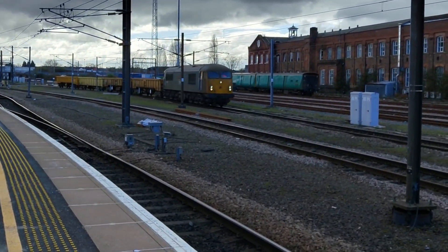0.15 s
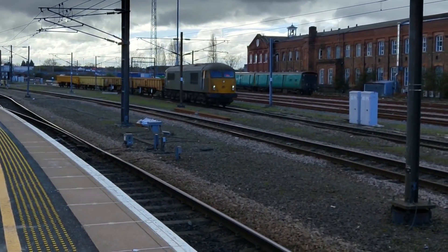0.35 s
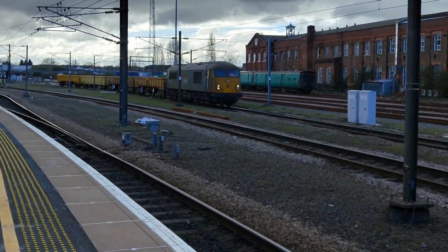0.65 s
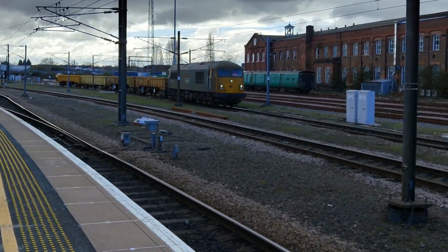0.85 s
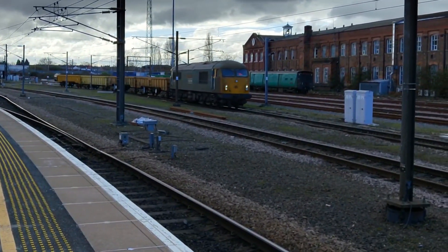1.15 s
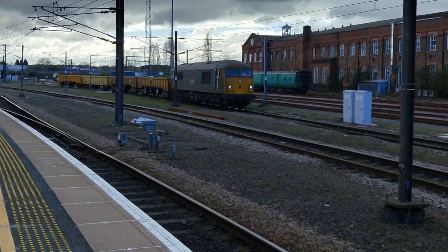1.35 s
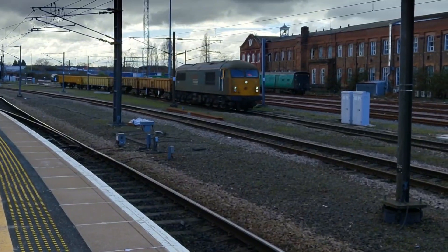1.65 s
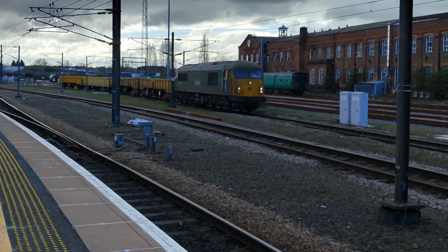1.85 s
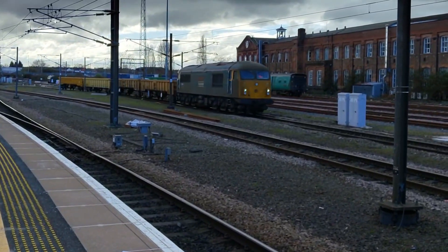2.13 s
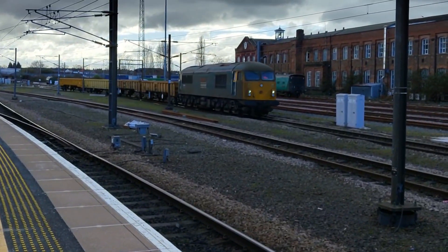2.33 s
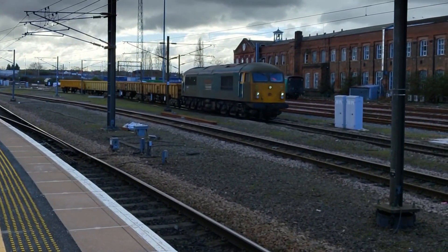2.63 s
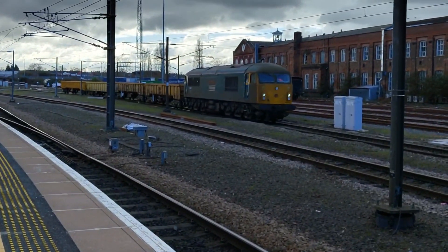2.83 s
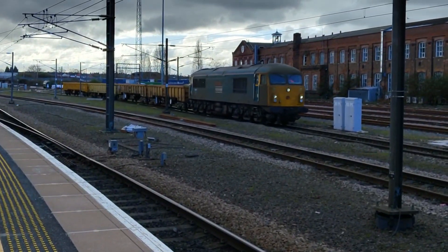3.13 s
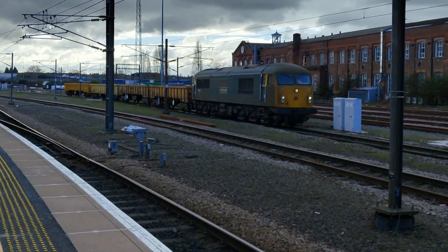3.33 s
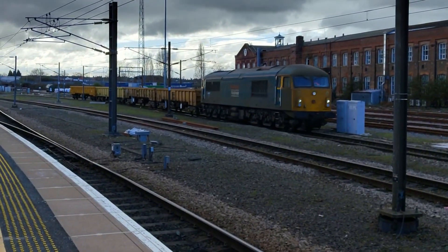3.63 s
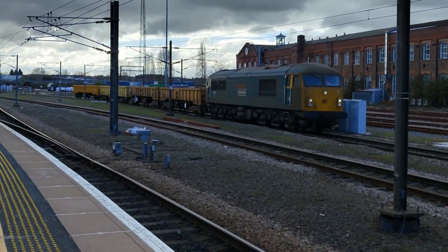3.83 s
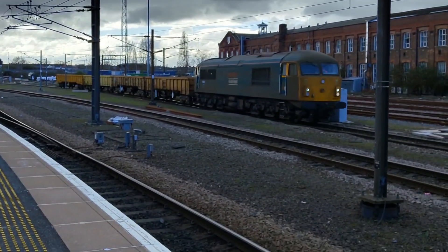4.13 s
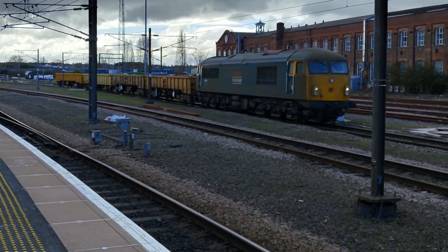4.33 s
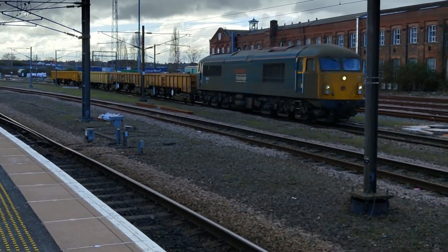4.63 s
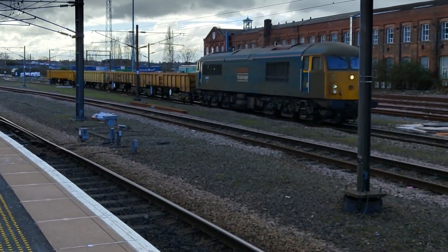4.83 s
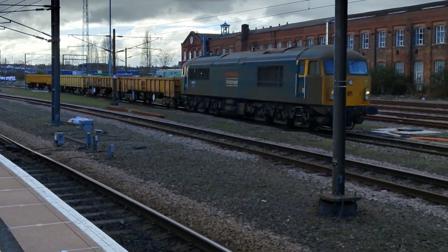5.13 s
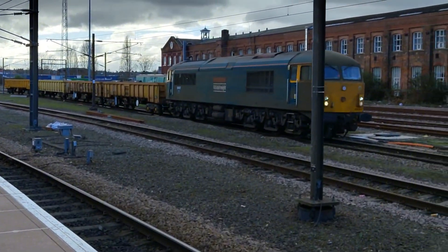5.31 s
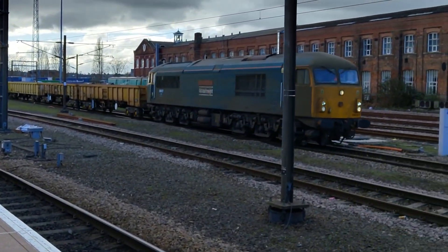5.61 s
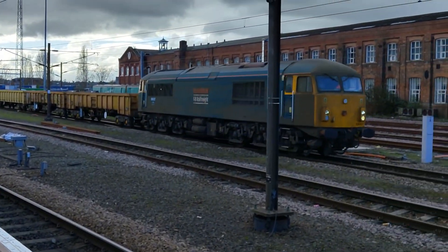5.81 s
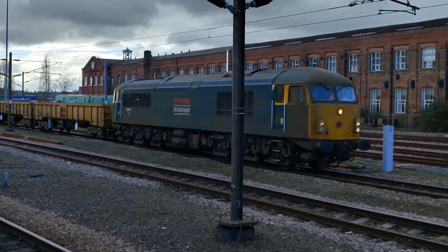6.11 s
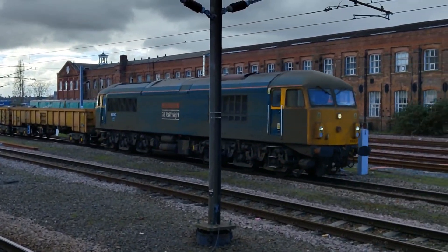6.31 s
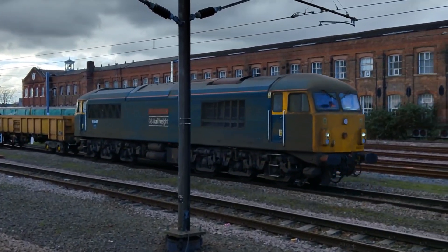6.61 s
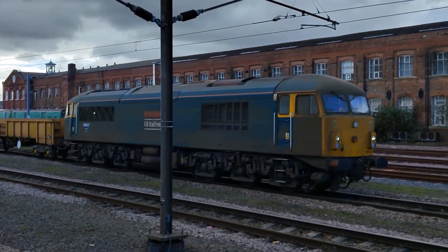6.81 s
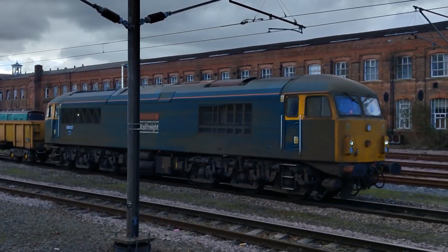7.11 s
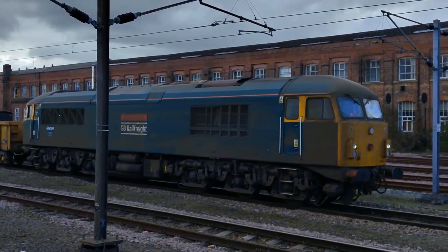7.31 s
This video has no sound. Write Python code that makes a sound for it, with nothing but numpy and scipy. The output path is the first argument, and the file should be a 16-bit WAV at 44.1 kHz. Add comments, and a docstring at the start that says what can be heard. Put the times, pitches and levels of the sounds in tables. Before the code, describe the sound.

A freight train approaches an open platform on a gusty day. Low wind rumble and moaning cover much of the distant engine and rolling noise, with sharp pops as gusts hit the handheld stereo microphone. The train steadily grows and brightens; metal rattles, short high squeals and soft knocks over rail joints join thin wavering whines. Late on, a longer squeal gives way to violent wind blows and a louder roar.

```python
"""Gusts moan, flutter and tear on a two-port microphone at a platform on a gusty day.
A diesel locomotive with wagons rolls in, its engine and wheels a noise that grows and changes colour.
Wavering tones make the turbocharger whine and gears; flanges squeal in short tones with partials,
taps ring loose steel, and shaped bursts of bright noise tick close by."""
import sys
import numpy as np
from scipy import signal
from scipy.fft import rfft, irfft, next_fast_len
from scipy.io import wavfile
from scipy.ndimage import uniform_filter1d

SR = 44100
rng = np.random.default_rng(int(sys.argv[2]) if len(sys.argv) > 2 else 0)


def undo_db(level):
    """Turn decibels back into plain size, where 20 dB means ten times bigger."""
    steps = np.asarray(level, float) / 20
    return 10 ** steps


def waveform_to_disk(signal):
    """Save audio, clipped to [-1, 1], as 16-bit WAV at the path in sys.argv[1]."""
    frames = np.transpose(np.atleast_2d(signal))
    scaled = np.clip(frames, -1, 1) * 32767
    samples = np.round(scaled).astype(np.int16)
    wavfile.write(sys.argv[1], SR, samples)


N = 328986  # samples


def ports(left, right):
    """One value for each microphone port, as a column."""
    return np.array([[left], [right]])


def evened(x):
    """Scales to rms 1."""
    return x / np.sqrt(np.mean(x ** 2) + 1e-20)


def read(points, hz):
    """Reads a spectrum table on a log-frequency axis."""
    f, value = np.transpose(points)
    return np.interp(np.log(hz + 1), np.log(f + 1), value)


def curve(table, column=1):
    """One column of a time table, sample by sample."""
    rows = np.array(table)
    return np.interp(np.arange(N) / SR, rows[:, 0], rows[:, column])


def in_band(x, lo, hi):
    """Scales x so that the mean of its ports has rms 1 between lo and hi Hz."""
    middle = x.reshape(-1, N).mean(0)
    z, hz = rfft(middle), np.fft.rfftfreq(N, 1 / SR)
    inside = (hz > lo) & (hz < hi)
    return x / (np.sqrt(2 * np.sum(abs(z[inside]) ** 2)) / N)


def drift(size):
    """Slow smooth chance, rms 1; size is the smoothing length in samples."""
    once = uniform_filter1d(rng.standard_normal(N), size=size)
    return evened(uniform_filter1d(once, size=size))


def wavering(hz, waver, size, count=N):
    """A tone of rms 1 whose pitch drifts at random by the fraction waver (rms)."""
    wander = evened(uniform_filter1d(rng.standard_normal(count), size=size))
    cycles = np.cumsum(hz * (1 + waver * wander)) / SR
    return np.sqrt(2) * np.sin(2 * np.pi * (cycles + rng.random()))


def narrow(hz, width, like, count=N):
    """Noise in a narrow band on both ports, rms 1; smoothed twice so that its skirts stay dark."""
    a, b = rng.standard_normal((count, 2, 2)).T[0] + 1j * rng.standard_normal((count, 2)).T
    like = np.clip(like, -1, 1)
    r = np.exp(-np.pi * width / SR)
    pair = [a, like * a + np.sqrt(1 - like ** 2) * b]
    slow = signal.lfilter([1], [1, -2 * r, r * r], pair)
    carrier = np.exp(2j * np.pi * np.cumsum(hz * np.ones(count)) / SR)
    return evened((slow * carrier).real)


def hiss(colour, same, patchy_db, size=1024):
    """Two-port noise from random short-time spectra with drifting patches."""
    frames, hz = N // (size // 4) + 5, np.fft.rfftfreq(size, 1 / SR)
    a, b, c, d, patches = rng.standard_normal((frames, len(hz), 5)).T
    patches = uniform_filter1d(patches, size=10, axis=0)
    patches = evened(uniform_filter1d(patches, size=12, axis=1))
    same = np.clip(same(hz), -1, 1)[:, None]
    left = a + 1j * b
    right = same * left + np.sqrt(1 - same ** 2) * (c + 1j * d)
    z = np.array([left, right]) * undo_db(read(colour, hz)[:, None] + patchy_db * patches)
    return signal.istft(z, nperseg=size, noverlap=size - size // 4)[1][:, :N]


def bursts(rows):
    """Envelope of events, each row (start s, peak dB, rise s, time to fall 60 dB in s)."""
    t, out = np.arange(N) / SR, np.zeros(N)
    for s, db, rise, t60 in rows:
        span = slice(round(s * SR), round((s + 1) * SR))
        u = t[span] - s
        fall_db = 60 * np.maximum(u - rise, 0) / max(t60, .005)
        out[span] += undo_db(db - fall_db) * np.clip(u / rise, 0, 1)
    return out


def spreading_db():
    """Loss with the locomotive's distance, 0 dB abeam of the microphone, a point still ahead at the end."""
    speed_m_per_s, abeam_s, aside_m = 7.34, 8.21, 15.96
    along = speed_m_per_s * (abeam_s - np.arange(N) / SR)
    return -10 * np.log10(1 + (along / aside_m) ** 2)


# Single sucks and rebounds of the diaphragm in the hardest gusts.
# Each row: start in seconds, peak in dB.
DIAPHRAGM_PUSHES = [(.354, -9), (.446, -8), (.469, -12), (.931, -17), (2.145, -12), (6.766, -11),
                    (7.052, -7.5), (7.076, -7), (7.156, -10)]


def pushes():
    """Each push is one lopsided pressure pulse: a suck, then a longer, weaker rebound."""
    push_s = .003  # time scale of the pulse
    kicks, u = np.zeros(N), np.arange(2000) / SR / push_s
    for s, db in DIAPHRAGM_PUSHES:
        kicks[round(s * SR)] = undo_db(db)
    return signal.oaconvolve(kicks, -u ** 2 * (3 - u) * np.exp(.25 - u))[:N]


# Colours of the wind at the ports: deep rumble, faster flutter, and tearing.
# Each row: frequency in Hz, relative level in dB per Hz.
RUMBLE_COLOUR = [(12, -19), (22, -1.5), (35, 3), (55, -5.5), (80, -8), (105, -4), (130, -25), (200, -46.5),
                 (500, -130)]
FLUTTER_COLOUR = [(70, -26), (110, 5.5), (200, 2), (300, -8), (400, -24), (600, -58.5), (1200, -130)]
TEAR_COLOUR = [(120, -31), (200, -12), (270, -1), (350, 3), (400, -5), (678, -12), (1110, -25.5),
               (1500, -22), (1950, -49), (3300, -120)]
# The gusts as they reach the microphone. Each row: time in seconds, strength in dB,
# share of the lower moan from 0 to 1, flutter in dB relative to the strength.
GUSTS = [(0, -26, 0.46, -14.5), (.11, -24.5, .6, -10.5), (.15, -18.5, 1, -14.5), (.42, -18.5, 0.98, -20),
         (.48, -19, 0.9, -20), (.53, -26, 1, -30), (.548, -40.5, 1, -7), (.75, -36, 0.1, -5),
         (.78, -28.5, 0.97, -7), (.92, -21, 0.38, -14), (1.2, -21, 0.9, -18), (1.42, -22, 0.04, -13),
         (1.74, -16.5, 1, -18), (1.85, -27.5, 0.1, -11), (1.9, -26.5, 0.4, -5.5), (1.99, -24.5, 0.76, -11),
         (2.04, -15.5, 0.95, -11.5), (2.16, -20, 0.22, -16), (2.45, -23.5, 0.84, -15),
         (2.93, -16, 0.76, -20.5), (3.1, -24.5, 0.26, -12.5), (3.74, -22, 1, -15.5),
         (3.95, -23.5, 0.44, -12), (4.7, -21, 0, -14), (5.17, -22.5, 1, -12), (5.25, -15.5, 0.83, -19.5),
         (5.7, -23.5, 0.43, -9.5), (6.1, -17, 0.4, -14.5), (6.5, -21.5, 0.26, -9), (6.84, -18, 0.86, -3.5),
         (6.91, -19, 0.86, -5.5), (6.94, -21, 1, -4.5), (7.02, -23.5, 1, 0), (7.04, -17, 0.4, -2),
         (7.12, -16, 1, -8), (7.2, -15.5, 1, -7.5), (7.345, -12.5, 1, -12), (7.365, -29, 0.9, -16),
         (7.42, -35, 0.8, -21), (7.46, -17, 0.4, -21)]
# Sudden blows of air. Each row: start in seconds, peak in dB.
BLOWS = [(0.255, -28.5), (0.355, -25), (0.441, -22), (0.467, -18.5), (0.928, -27), (1.111, -24.5),
         (1.474, -25), (1.631, -27), (1.725, -34), (2.953, -30), (4.527, -26.5), (5.148, -38), (5.375, -41),
         (6.669, -17), (6.754, -14.5), (6.766, -23.5), (6.827, -23), (6.88, -17.5), (7.034, -19),
         (7.047, -4.5), (7.072, -13.5), (7.12, -15), (7.147, -13.5), (7.165, -16), (7.191, -21.5),
         (7.291, -16), (7.325, -24.5)]


def wind():
    """Lumpy pressure on the ports: rumble, moans, a faster flutter, tearing and blows in hard gusts."""
    rumble_db, moan_db = -3.5, -1.5  # relative to the gust strength
    moan_hz, moan_waver = (42.2, 66.73), 0.0602
    throb_db, eddy_lumps_db, tear_lumps_db = 1.5, 0.88, 2.5  # rms swings
    blow_rise_s, blow_dying_s, thump_db = 0.0057, 0.095, -6.5  # each blow also pushes the rumble
    tear_db, tear_from_db, tear_growth = -33, -21.5, 1.3  # tearing grows faster than its flutter
    tear_lean_db = -11  # left minus right
    turn_db_per_s, turned_s = 2, 8.1  # the microphone turns into the wind, so tearing gains with time
    rumble = in_band(hiss(RUMBLE_COLOUR, lambda hz: 1 + 0 * hz, 0.62, size=4096), 34.7, 100)
    flutter = in_band(hiss(FLUTTER_COLOUR, lambda hz: 1 + 0 * hz, 1.3, size=2048), 74, 420)
    lumps = drift(size=700)
    tear = hiss(TEAR_COLOUR, lambda hz: .3 + 0 * hz, 2.5) * undo_db(tear_lumps_db * lumps)
    tear = in_band(tear, 330, 600)

    strength_db = curve(GUSTS)
    lower = np.clip(curve(GUSTS, column=2), 0, 1)
    blows = bursts([(s, db, blow_rise_s, blow_dying_s) for s, db in BLOWS])
    eddies = undo_db(strength_db + curve(GUSTS, column=3) + eddy_lumps_db * lumps) + blows
    turn_db = turn_db_per_s * (np.arange(N) / SR - turned_s)
    torn = undo_db(tear_db + turn_db + ports(.5, -.5) * tear_lean_db)
    torn = torn * (eddies / undo_db(tear_from_db)) ** tear_growth

    moans = lower * wavering(moan_hz[0], moan_waver, size=4000)
    moans = moans + (1 - lower) * wavering(moan_hz[1], moan_waver, size=4000)
    throbs = undo_db(strength_db + throb_db * drift(size=1500))
    low = throbs * (undo_db(rumble_db) * rumble + undo_db(moan_db) * moans)
    pressure = low + undo_db(thump_db) * blows * rumble + pushes() + eddies * flutter + torn * tear
    return .9 * np.tanh(pressure / .9)  # the strongest blows saturate the diaphragm


# Colour of the ticks. Each row: frequency in Hz, relative level in dB per Hz.
TICK_SPECTRUM = [(2000, -15.5), (3200, -6), (5000, -5), (6500, 2), (7700, -7), (8500, -20.5), (9500, -8),
                 (12000, -13), (15000, -15.5), (15800, -42)]
# Small sharp ticks close to the microphone.
# Each row: start in seconds, level in dB, left minus right in dB.
CLOSE_TICKS = [(0.4805, -74, 12), (1.32, -66.5, 6), (3.078, -51.5, -9), (3.357, -52.5, -12),
               (4.28, -51.5, -9), (4.554, -51, -4), (4.827, -53, -10)]


def ticks():
    """Each tick is a bright crackle of about a hundredth of a second, with weaker ones around it."""
    rebound_s, rebound_db = .053, -11.5  # a weaker one after
    lead_s, lead_db = 0.029, -13  # and a weaker one before
    noise = in_band(hiss(TICK_SPECTRUM, lambda hz: 0.19 + 0 * hz, 2.1, size=256), 9000, 20000)
    t, shape = np.arange(N) / SR, np.zeros((2, N))
    for s, db, pan_db in CLOSE_TICKS:
        for later, less_db in (0, 0), (rebound_s, rebound_db), (-lead_s, lead_db):
            u = np.clip(t - s - later, 0, 1)
            dying = np.exp(-(u / .0085) ** 2) + .12 * np.exp(-u / .035)  # a faint tail lasts longer
            body = np.clip(u / .002, 0, 1) * dying
            shape += undo_db(db + less_db + ports(.5, -.5) * pan_db) * body
    return noise * shape


# Loose steel on the train. Each row: ringing frequency in Hz, relative level in dB,
# time to fall 60 dB in seconds.
LOOSE_STEEL = [(3560, 4.5, 0.0033), (5760, -26, 0.013), (6230, -8.5, 0.0098), (6700, -1.5, 0.0054),
               (7240, 0, 0.0038), (7230, -8.5, 0.0072), (9990, -20.5, 0.015), (12100, -30.5, 0.006)]
# Bursts of rattling. Each row: start in seconds, peak in dB, time to fall 60 dB in seconds.
RATTLE_BURSTS = [(0.213, -72, 0.2), (0.575, -62.5, 0.13), (1.048, -71, 0.043), (1.3653, -65, 0.29),
                 (1.7779, -59, 0.22), (2.1286, -62, 0.29), (2.314, -57.5, 0.19), (2.374, -57, 0.14),
                 (2.5187, -56.5, 0.13), (2.7294, -55, 0.17), (2.9856, -62, 0.16), (3.029, -55.5, 0.18),
                 (3.252, -60, .05), (3.7239, -62, 0.055), (3.9384, -61, 0.066), (4.4603, -59, 0.068),
                 (4.4917, -55.5, 0.48), (4.8813, -59, 0.23), (4.9741, -59, 0.13), (5.2101, -64.5, 1),
                 (5.6032, -58.5, 0.2), (5.6635, -59.5, 0.34), (6.0367, -67, 0.045), (6.8364, -49.5, 0.36),
                 (7.0868, -56, 0.13), (7.2694, -64, 0.1)]


def rattle():
    """Dense uneven taps ring the resonances of loose steel, swelling in bursts."""
    shaking_db, shaking_slope, fits_db = -57, 2.22, 3.94  # abeam level, dB per dB of spreading, rms swing
    taps_per_s = 500  # on each port, for each resonance
    t = np.arange(1500) / SR
    fits = evened(uniform_filter1d(rng.standard_normal(N), size=2500))  # the shaking comes in fits
    force = undo_db(shaking_db + shaking_slope * spreading_db() + fits_db * fits)
    force = force + bursts([(s, db, 0.0009, t60) for s, db, t60 in RATTLE_BURSTS])
    out = np.zeros((2, N))
    for hz, db, t60 in LOOSE_STEEL:
        strength = undo_db(2.0 * np.minimum(rng.exponential(1, (N, 2)).T, 5))
        taps = strength * (rng.random((N, 2)).T < taps_per_s / SR)
        taps = taps * rng.choice([-1, 1], (N, 2)).T
        onset = np.minimum(t / 0.00018, 1)
        ring = undo_db(db - 60 * t / t60) * onset * np.sin(2 * np.pi * hz * t)
        out += signal.oaconvolve(taps, ring[None], axes=1)[:, :N]
    crossed = out + 0.23 * out[::-1]  # each port also hears some of the other side
    return in_band(crossed, 3860, 6200) * force


# Flange squeals. Each row: start in seconds, end in seconds, pitch in Hz, level in dB,
# 2nd partial in dB relative to that level, 5th partial likewise.
FLANGE_SQUEALS = [(1.089, 1.332, 1407, -53.5, 1, -1), (3.475, 3.62, 1395, -52, -26, -29),
                  (4.463, 4.573, 1264, -70, -12, 18), (5.514, 5.646, 1380, -53, -20, -15),
                  (6.0, 6.12, 1208, -46, -20, -24), (6.335, 6.683, 1377, -41, -14, -26)]


def squeals():
    """Stick-slip of a flange rings the wheel on a tone and two of its partials."""
    flutter_db = 0.9
    out = np.zeros((2, N))
    for start, end, hz, db, second_db, fifth_db in FLANGE_SQUEALS:
        span = slice(round(start * SR), round(end * SR))
        count = span.stop - span.start
        tone = wavering(hz, 0.0042, size=900, count=count) * ports(1.2, .4)
        second = wavering(2 * hz, 0.0013, size=900, count=count) * ports(1.2, .3)
        fifth = narrow(5 * hz, 60, 0.34, count=count)
        tone = tone + undo_db(second_db) * second + undo_db(fifth_db) * fifth
        level = undo_db(db + flutter_db * drift(size=500)[:count])
        out[:, span] += level * signal.windows.tukey(count, .65) * tone
    return out


# Gear tones. Each row: time in seconds, lower tone in dB, upper tone in dB.
GEAR_LEVELS = [(0, -61, -70.5), (1.3, -73.5, -69), (1.5, -66, -63), (2.7, -72, -66), (2.85, -57.5, -61),
               (3.3, -67, -66), (4.1, -64, -63), (4.3, -57.5, -74), (5.3, -56, -69.5), (5.5, -68, -61),
               (5.95, -65, -69), (6.1, -51, -65), (6.5, -51.5, -66), (6.9, -51, -66), (7.46, -56, -62)]


def gears():
    """Two thin gear tones, nearly steady in pitch, flutter a little in level."""
    out = np.zeros((2, N))
    for column, hz in (1, 1330), (2, 1446):
        level = undo_db(curve(GEAR_LEVELS, column=column) + 1.7 * drift(size=2500))
        out += level * wavering(hz, 0.003, size=700) * ports(1.1, .6)
    return out


# Turbocharger whine. Each row: time in seconds, level in dB.
WHINE_LEVEL = [(0, -66.5), (.4, -68.5), (.9, -76.5), (1.2, -69), (1.7, -70.5), (2.0, -65), (2.3, -62.5),
               (2.6, -60), (2.75, -58), (2.9, -63), (3.1, -66), (3.75, -75.5), (4.5, -65.5), (5.0, -70.5),
               (5.4, -62.5), (5.55, -56), (5.85, -52.5), (5.95, -63), (6.35, -62.5), (6.8, -56),
               (7.17, -54), (7.46, -58)]


def whine():
    """The turbocharger: a thin tone that wavers and swells on its way through moving air."""
    whine_hz, swell_db = 4443, 1
    sag_from_s, sag_hz_per_s = 5.8, 19  # the pitch sinks as the locomotive draws level
    hz = whine_hz - sag_hz_per_s * np.maximum(np.arange(N) / SR - sag_from_s, 0)
    tone = wavering(hz, 0.0015, size=800) * ports(.8, .2)
    tone = tone + 1.18 * narrow(whine_hz - (whine_hz - hz), 24, 0.48)
    return undo_db(curve(WHINE_LEVEL) + swell_db * drift(size=2500)) * tone


# How alike the train sounds at the two ports. Each row: frequency in Hz, likeness from 0 to 1.
PORT_LIKENESS = [(60, 0.91), (100, 0.36), (170, 0.93), (300, 0.85), (500, 0.87), (850, 0.35), (1450, 0.058),
                 (2470, 0.53), (4210, 0.07), (7160, 0.04)]


def hum(hz, width, far_db, near_db, near):
    """One resonance fed by rolling noise; it swells and wanders in pitch on its own."""
    swell_db, pitch_drift = 2, 0.001985  # rms swing, rms fraction of the pitch
    band = narrow(hz * (1 + pitch_drift * drift(size=9000)), width, read(PORT_LIKENESS, hz))
    return undo_db(far_db + (near_db - far_db) * near + swell_db * drift(size=4000)) * band


# Colours of the train far off and close to the microphone.
# Each row: frequency in Hz, relative level in dB per Hz.
FAR_COLOUR = [(35, -36), (60, 6), (108, -0.5), (329, -15.5), (364, -4.5), (395, -3.5), (446, -8.5),
              (569, -12), (697, -5), (1180, -20), (1840, -19), (2760, -29.5), (3060, -19), (4140, -31),
              (7610, -70), (9890, -71.5), (16700, -120)]
NEAR_COLOUR = [(120, -32), (200, -3.5), (288, 1.5), (409, -31), (441, -13.5), (538, -18.5), (697, -12),
               (1100, -25), (1360, -15.5), (1640, -17), (2220, -14), (2450, -18.5), (2750, -26),
               (3100, -21), (4530, -28.5), (5360, -32.5), (7610, -37.5), (9890, -59), (14000, -64),
               (16700, -120)]
# The approach. Each row: time in seconds, share of the near colour from 0 to 1.
APPROACH = [(0, 0.18), (3, 0.58), (5.3, 0.48), (5.9, 0.92), (7.46, 0.94)]
# Body, gears and rails hum in narrow bands. Each row: centre in Hz, width in Hz of each of two
# smoothings, level in dB relative to the roar when far, the same when near.
NARROW_HUMS = [(353.5, 38, -1.5, -10.5), (439, 17.6, -5.5, -8.5), (700.3, 45, -2, -8.5),
               (728.6, 33, -2, -7.5), (1014, 47, -9.5, -17), (1870, 34, -15, -10.5),
               (2432, 38, -12.5, -9.5), (2680, 14, -20, -27), (3215, 70, -19, -24), (3545, 70, -27, -17), ]
# Wheels over joints and points. Each row: start in seconds, envelope peak in dB,
# rise in seconds, time to fall 60 dB in seconds.
RAIL_JOINTS = [(1.23, -45, 0.045, .3), (5.6, -47, 0.091, 0.5), (5.93, -38.5, 0.11, 0.91),
               (6.829, -37, 0.057, 0.15), (7.2014, -40, 0.018, 0.23)]


def roar():
    """Engine and rolling noise turn from the far colour to the near one; joints add knocks."""
    roar_db, joint_band_hz = -38.5, (620, 2500)  # roar level when abeam
    near = np.clip(curve(APPROACH), 0, 1)
    far, close = (in_band(hiss(colour, lambda hz: read(PORT_LIKENESS, hz), 1.67), 664, 6300)
                  for colour in (FAR_COLOUR, NEAR_COLOUR))
    hums = sum(hum(*row, near) for row in NARROW_HUMS)
    level = undo_db(roar_db + spreading_db())
    rolling = level * (np.sqrt(1 - near) * far + np.sqrt(near) * close + hums)
    joint_filter = signal.butter(1, joint_band_hz, "band", fs=SR, output="sos")
    knocks = signal.sosfilt(joint_filter, close) * bursts(RAIL_JOINTS)
    return rolling + knocks


def scene():
    """Wind on the ports, ticks close by, and the train rolling in."""
    return wind() + ticks() + rattle() + squeals() + gears() + whine() + roar()


def low_pass(x):
    """Removes everything above the highest recorded frequency."""
    return signal.sosfilt(signal.butter(12, 15700, fs=SR, output="sos"), x)


# Difference between the ports. Each row: frequency in Hz, left minus right in dB.
PORT_LEAN = [(400, 0), (550, 5.5), (790, -1.5), (1400, 5.5), (2400, -2), (5000, -2), (7200, 11.5),
             (10000, 7)]
# Treble response of the microphone. Each row: frequency in Hz, gain in dB.
MIC_TREBLE = [(7600, -0.5), (7900, -7), (8700, -24), (9500, -8), (10300, -5.5), (11000, -5.5), (14500, 0.5),
              (15700, -17.5)]


def record(dry):
    """The microphone colours the treble and each port differently, and sums its ports in the bass."""
    mono_hz = 434  # below this the two ports are summed
    size = next_fast_len(N + SR // 2)
    hz = np.fft.rfftfreq(size, 1 / SR)
    response_db = ports(.5, -.5) * read(PORT_LEAN, hz) + read(MIC_TREBLE, hz)
    left, right = rfft(dry, size) * undo_db(response_db)
    mid = (left + right) / 2
    side = (left - right) / 2 / np.sqrt(1 + (mono_hz / (hz + 1)) ** 25.0)
    mix = irfft(np.array([mid + side, mid - side]), size)[:, :N]
    return low_pass(mix)


dry = scene()
out = record(dry)
waveform_to_disk(out)
```